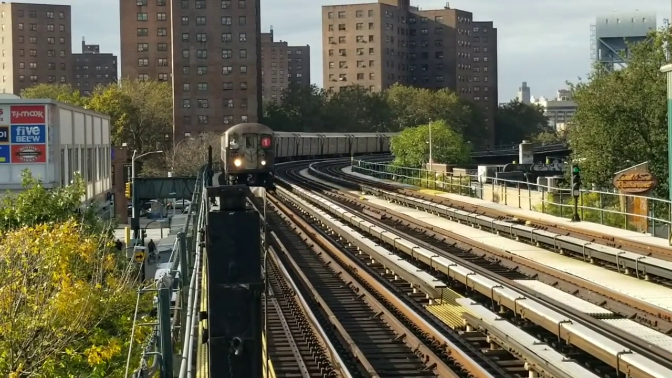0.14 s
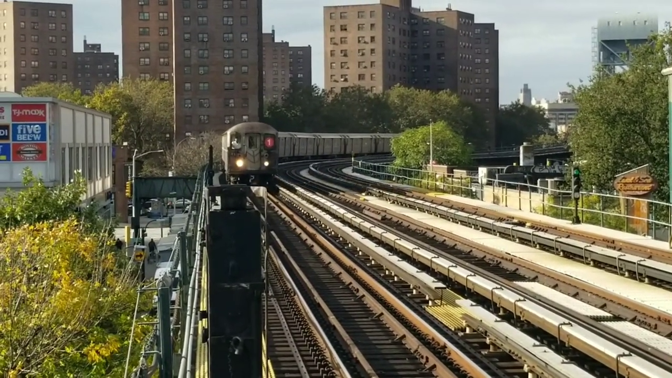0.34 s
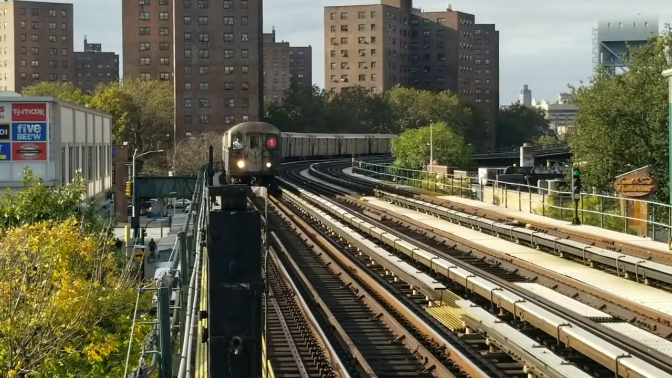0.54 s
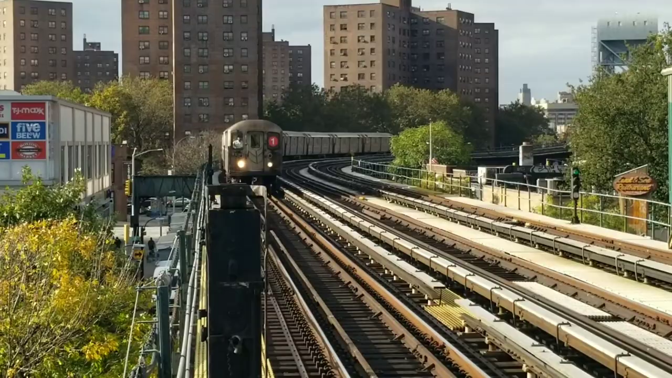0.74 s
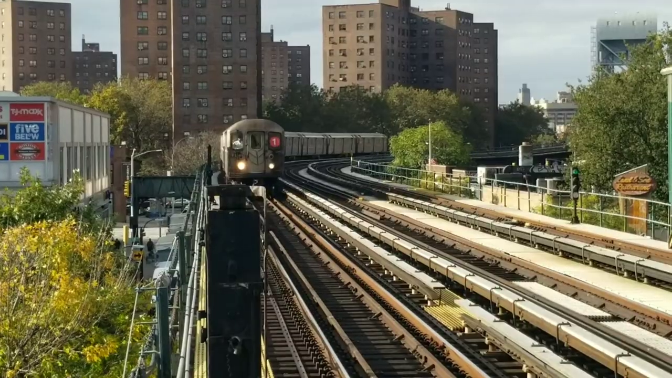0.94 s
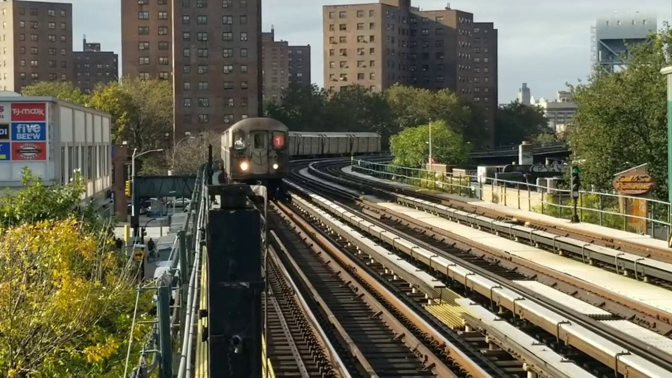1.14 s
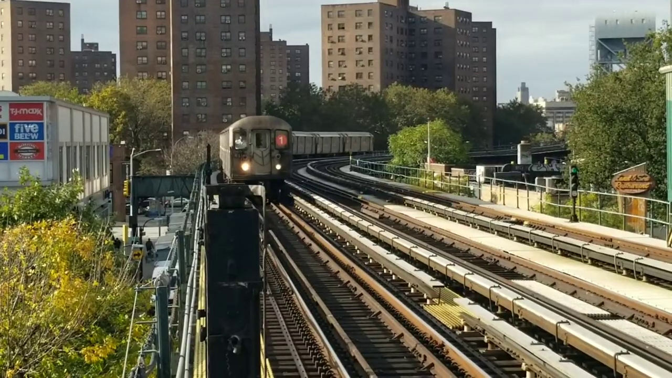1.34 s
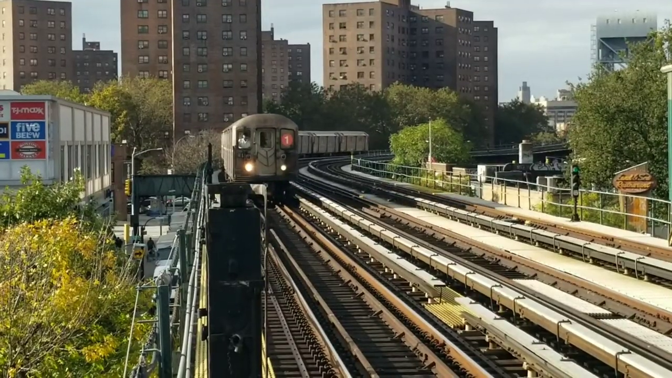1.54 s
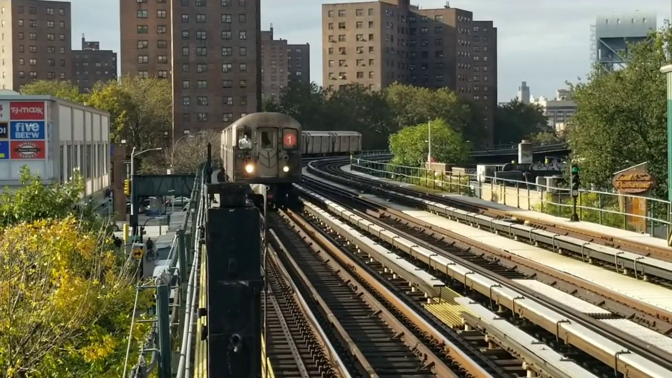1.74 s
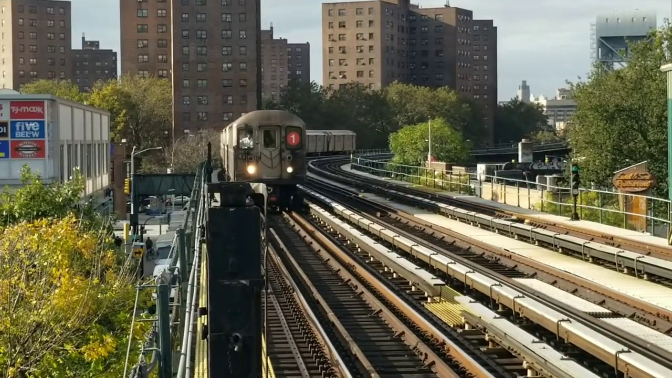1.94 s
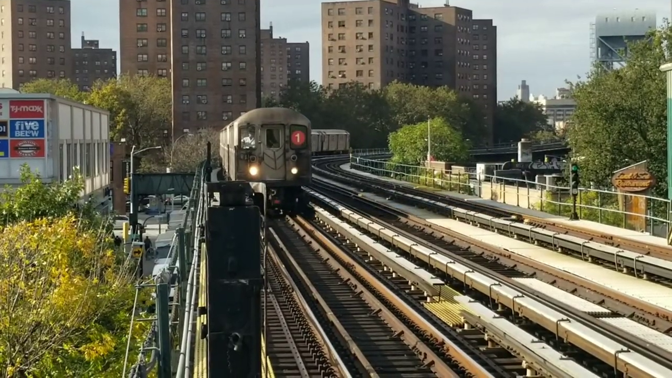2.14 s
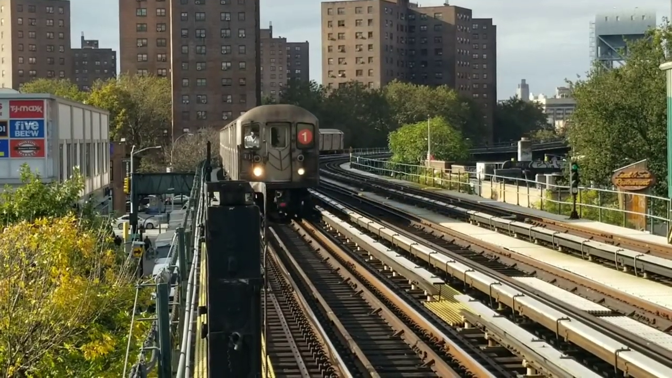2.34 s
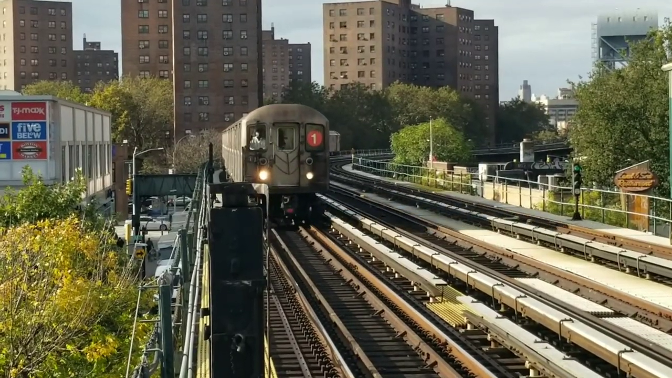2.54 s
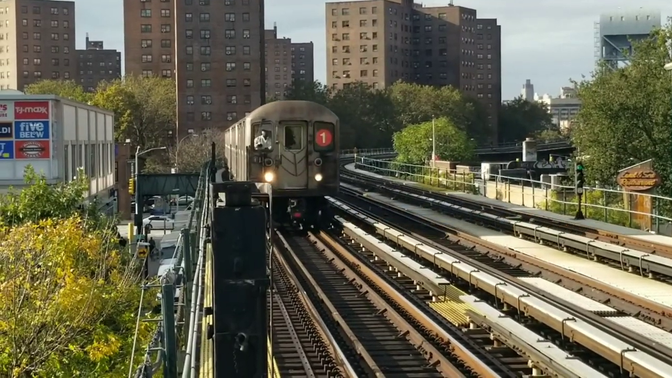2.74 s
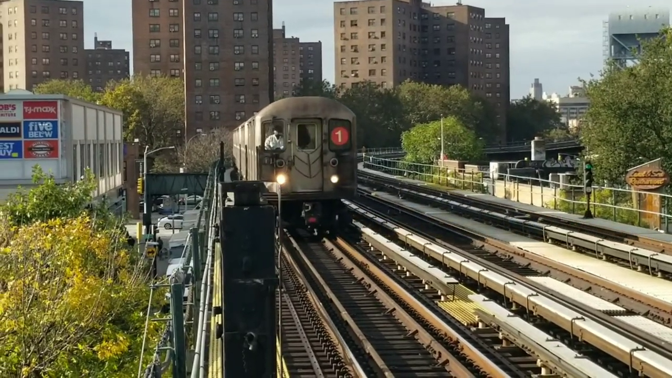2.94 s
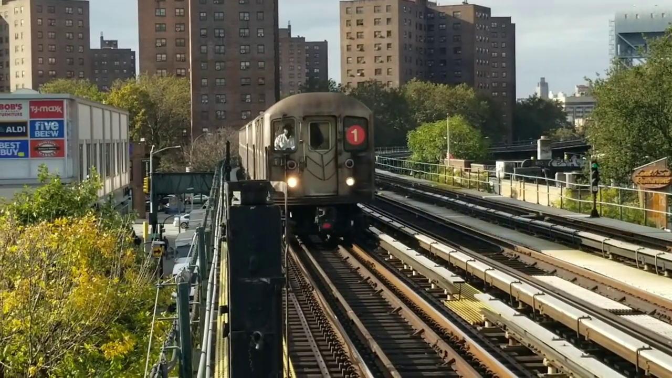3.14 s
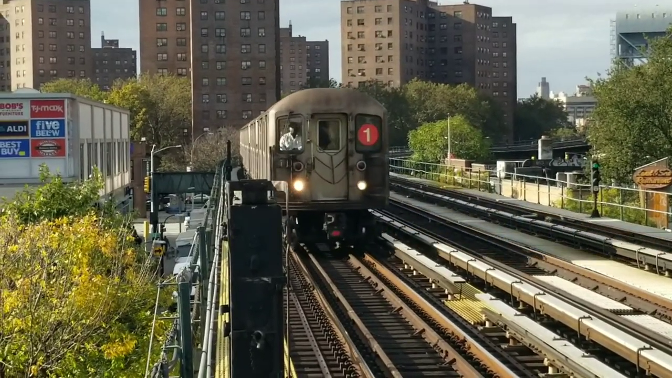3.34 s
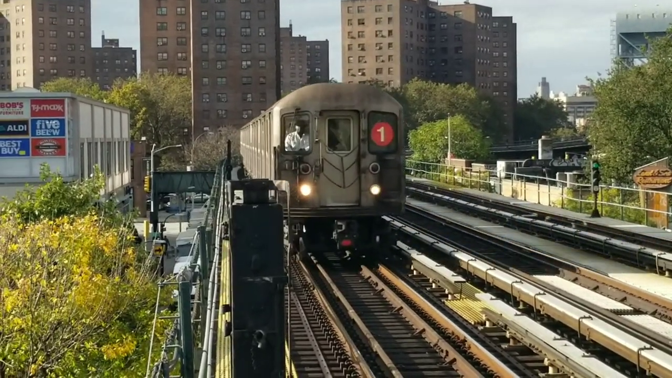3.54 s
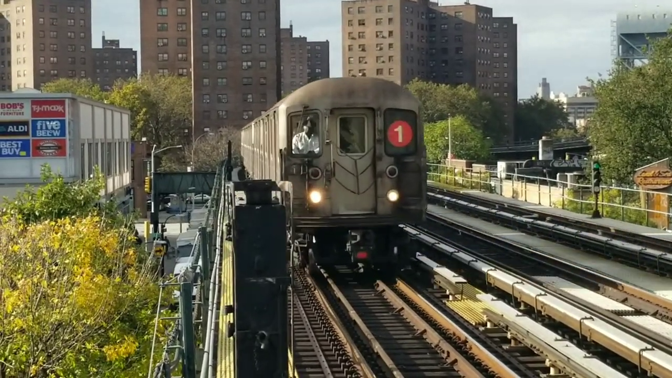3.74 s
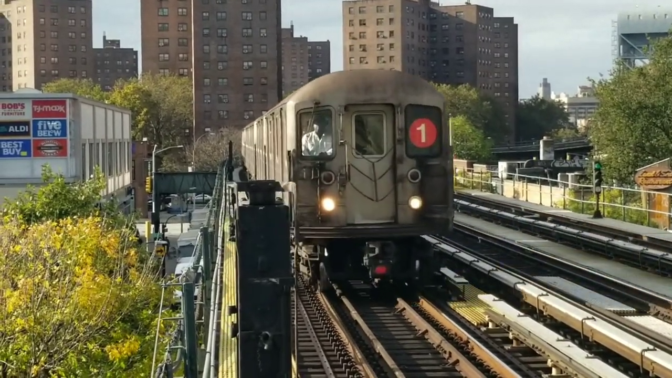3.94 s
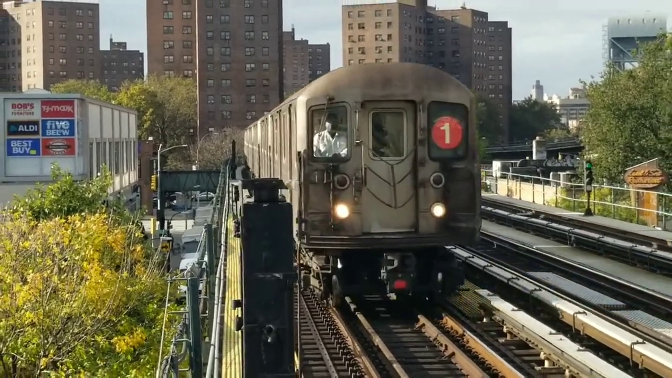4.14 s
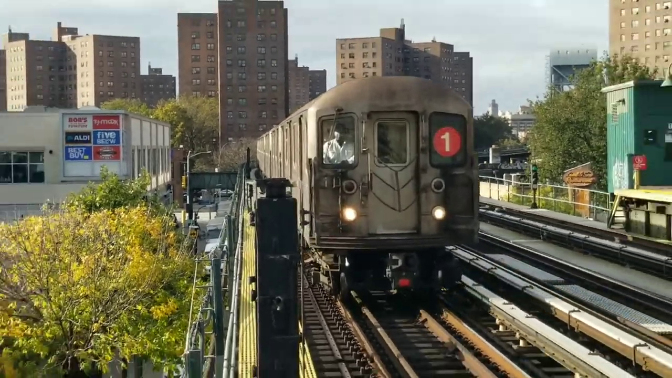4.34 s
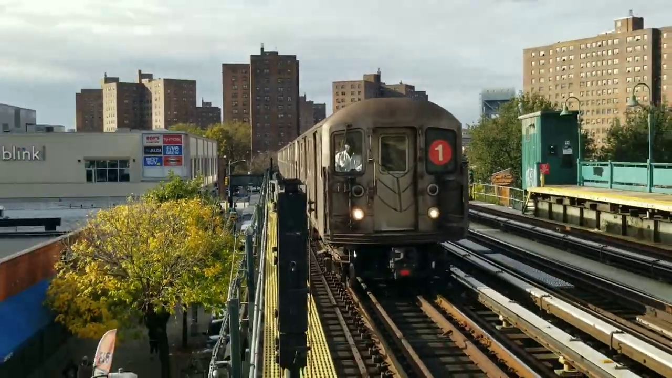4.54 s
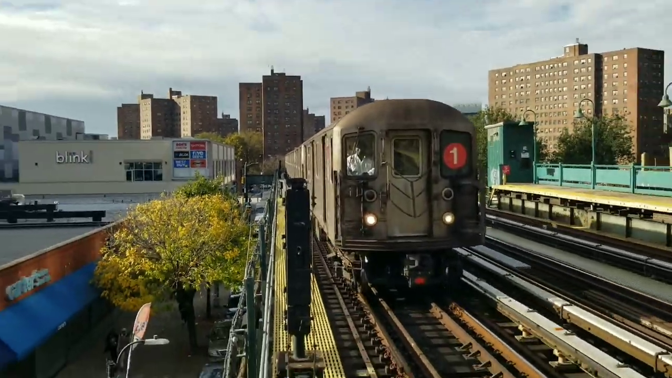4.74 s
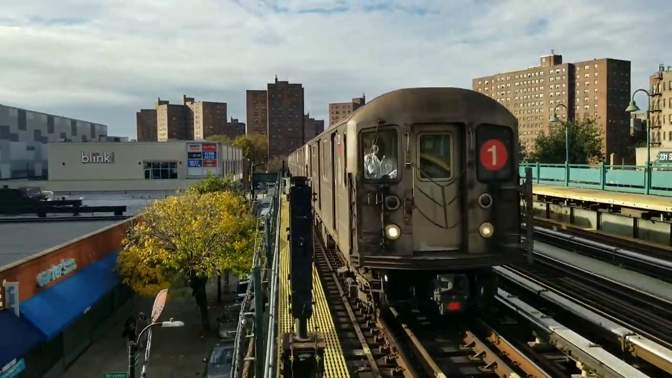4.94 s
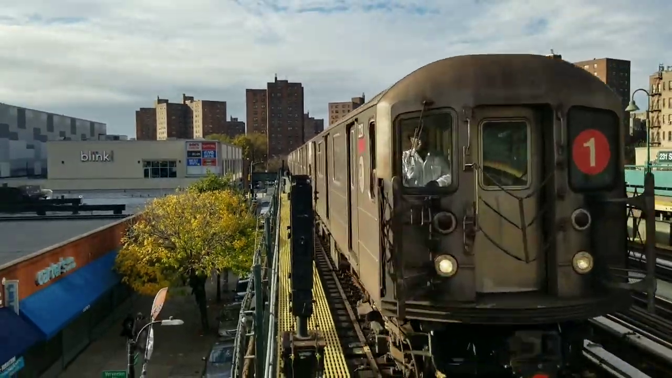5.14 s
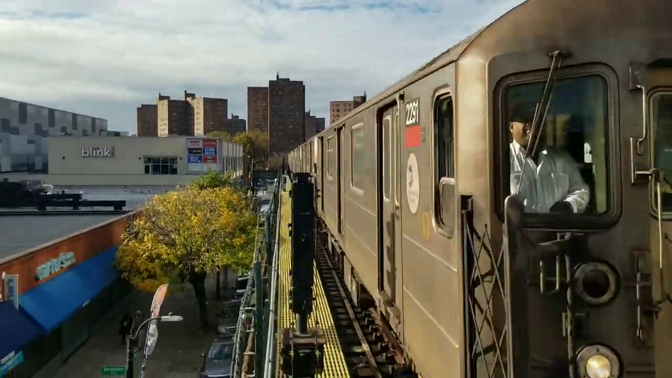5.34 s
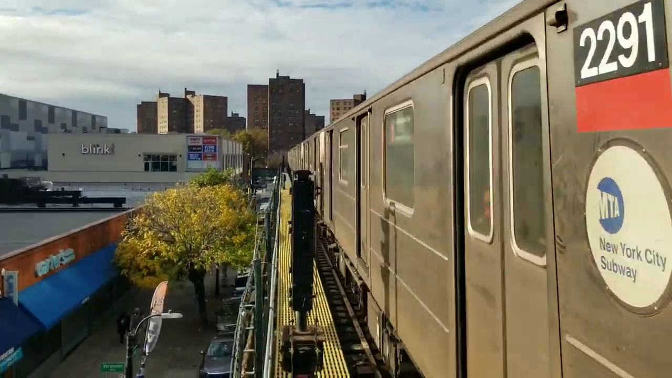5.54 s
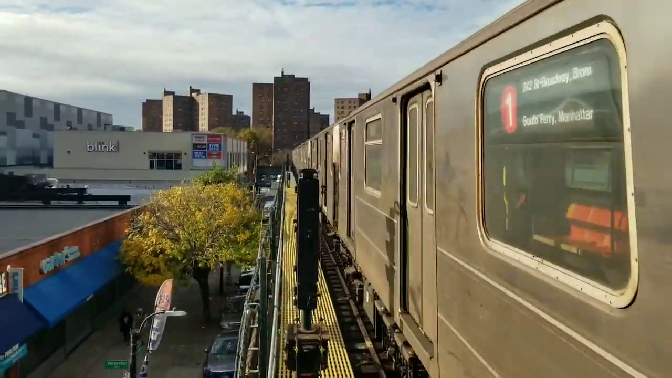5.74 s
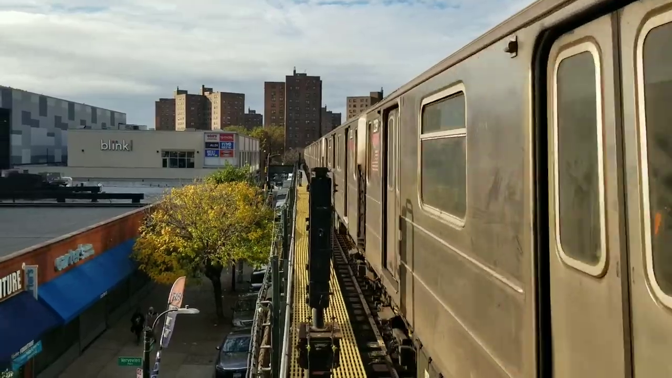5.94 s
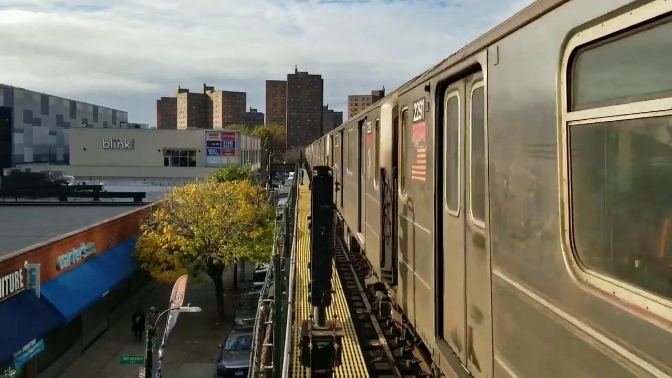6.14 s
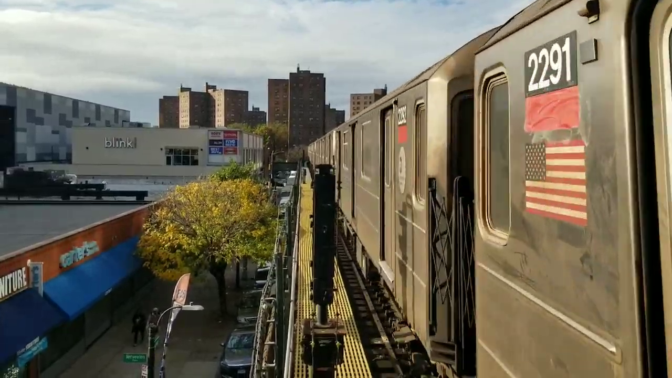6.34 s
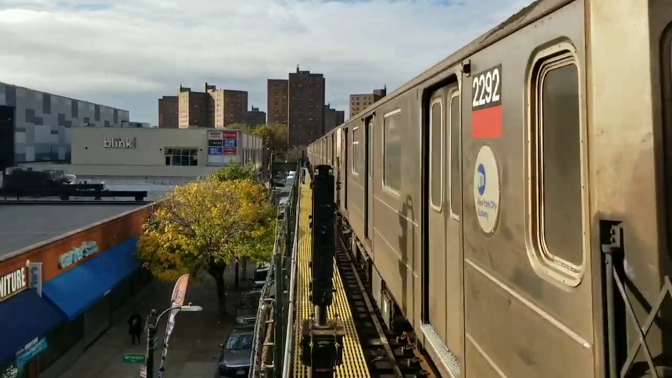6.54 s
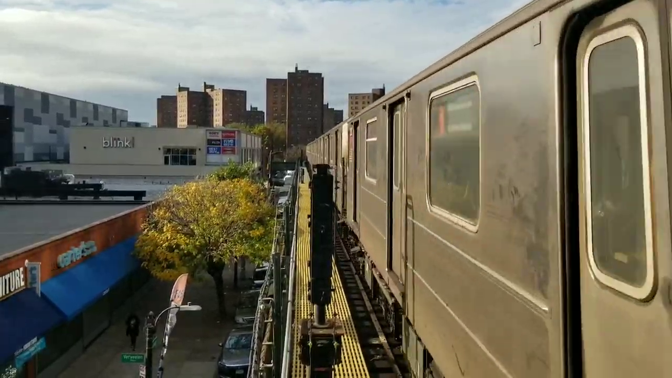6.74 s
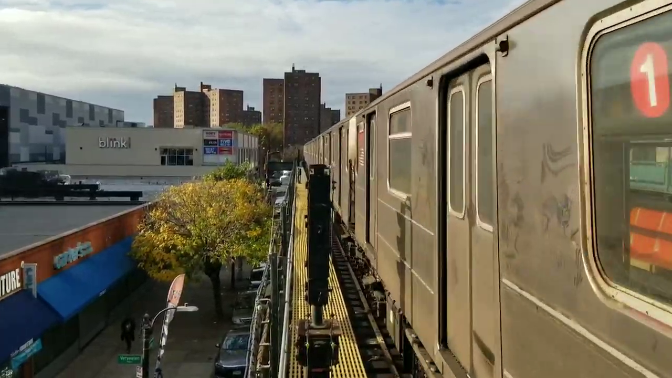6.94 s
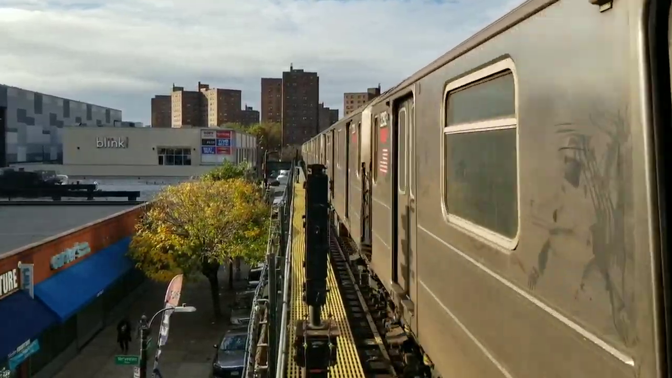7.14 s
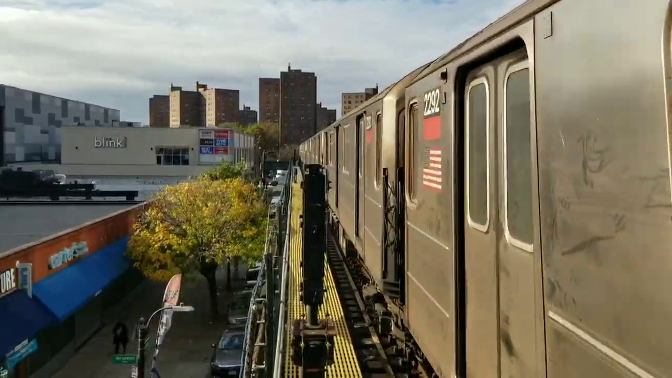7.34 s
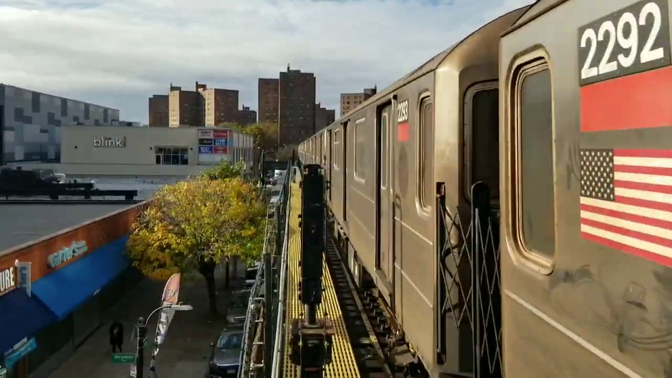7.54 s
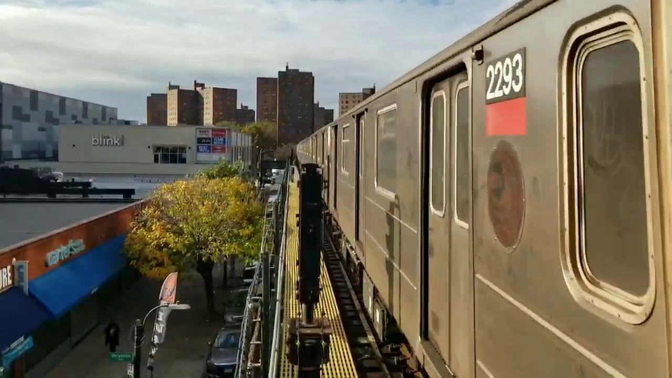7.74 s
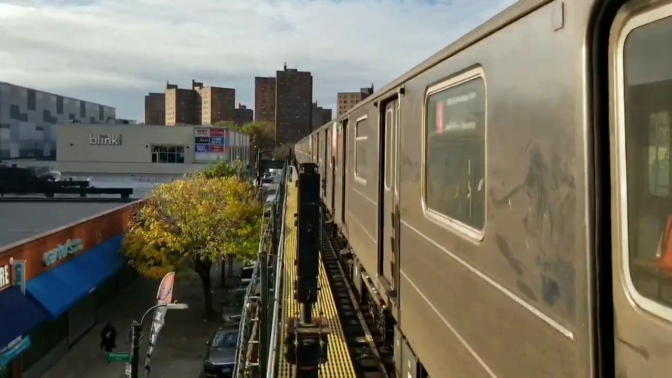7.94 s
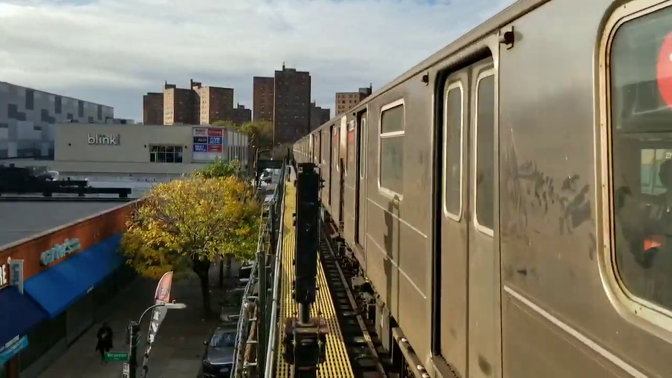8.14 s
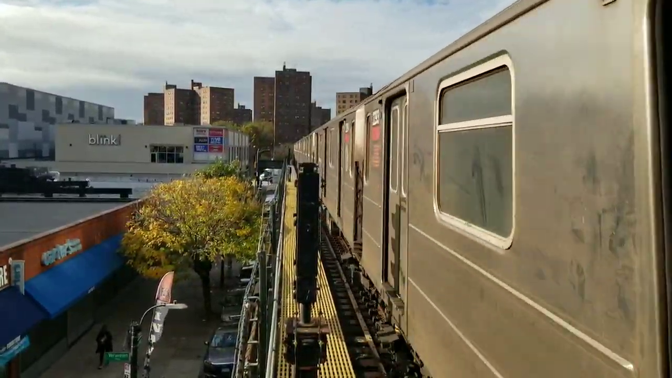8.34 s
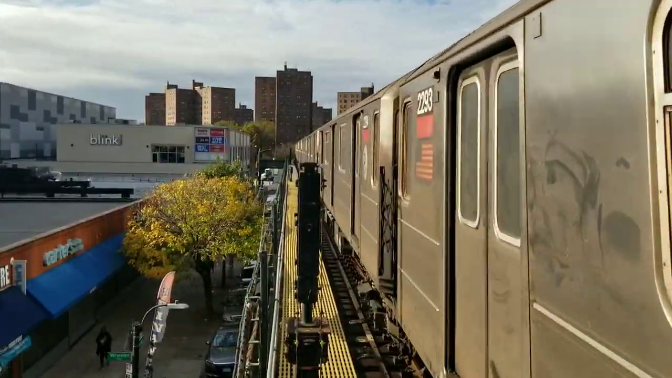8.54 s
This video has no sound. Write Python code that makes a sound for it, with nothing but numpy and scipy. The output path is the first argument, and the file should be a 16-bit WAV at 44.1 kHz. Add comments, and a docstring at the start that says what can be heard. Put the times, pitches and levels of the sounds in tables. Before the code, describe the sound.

A heavy rumble grows steadily while thin, wavering wheel tones chirp about five or six times a second. The train suddenly arrives beside a close stereo microphone on the steel viaduct, with hard joint knocks, ringing clangs, gritty crackle and scraping squeals. Pushed air thumps the microphone, then the roar drops; softer wheel knocks and rattles continue until a hum and squeals raise the end.

```python
"""On a steel viaduct by a curve: a subway train nears from 38 m and passes 1.4 m from a two-port microphone.
Level-shaped noise makes the deck rumble and wheel roar; decaying modes and noise make joints, snaps and rattles.
Wavering narrow-band tones sing in the curve and squeal alongside; low noise bursts buffet each port.
The later cars roll by more quietly, with thin brake whistles, a gear hum and one more run of squeals."""
import sys
import numpy as np
from scipy import signal
from scipy.fft import rfft, irfft, next_fast_len
from scipy.io import wavfile
from scipy.ndimage import uniform_filter1d

SR = 44100
rng = np.random.default_rng(int(sys.argv[2]) if len(sys.argv) > 2 else 0)


def persist_wave(psi):
    """Save psi, clipped to +-1, as 16-bit WAV."""
    counts = np.round(np.clip(psi, -1, 1) * 32767).astype(np.int16)
    wavfile.write(sys.argv[1], SR, np.atleast_2d(counts).T)


N = 383229
TIME = np.arange(N) / SR
FRAME, HOP = 2048, 256  # samples
EDGE_HZ = 15650  # upper band limit
TRUCK_S = 0.34  # half length of a truck's swell
GRIT_PEAK_S, GRIT_HALF_S = 5.19, 0.33
RATTLE_FROM_S = 4.93
SQUEAL_ATTACK_S, SQUEAL_RELEASE_S = 0.023, 0.031
SPAN_REACH_M = 59  # distance scale of the span resonance

# Train position: t/s, distance to nearest wheels/m, stage (0 ahead, 1 first truck, 2 alongside; clipped to 0-2)
APPROACH = [(0, 37.6, 0.11), (2.5, 28.6, 0), (3.6, 19.5, 0), (4.5, 11.8, 0.06), (4.86, 12, -0.1),
            (4.93, 4.1, 1.17), (5.75, 1.4, 0.98), (6.15, 9.9, 3)]
# Rolling-noise colour at each stage, before its bands are levelled: f/Hz, density/dB per Hz
AHEAD_COLOUR = [(25, -1), (52, 9), (130, -2), (235, -4), (345, -2), (460, -7), (600, -18.5), (1200, -27.5),
                (1600, -27.5), (1780, -30), (2050, -29.5), (2500, -27.5), (3300, -31.5), (5200, -35.5),
                (6500, -44.5), (7800, -51), (10500, -49), (15000, -64.5)]
FIRST_TRUCK_COLOUR = [(30, -3), (55, -1), (130, -1.5), (400, 1.5), (620, -8.5), (1200, -11), (1600, -12),
                      (1850, -13.5), (2500, -17.5), (3300, -29), (5200, -35), (7800, -40.5), (10500, -40),
                      (15000, -39.5)]
ALONGSIDE_COLOUR = [(28, -14), (52, 7.5), (85, 4), (150, -1), (250, -3.5), (430, -2), (620, -10.5),
                    (1050, -18.5), (1300, -19), (1770, -24), (2100, -20.5), (2500, -25), (3300, -26.5),
                    (5200, -27), (7800, -39), (10500, -32.5), (15000, -39.5)]
# What the two ports hear at each stage: f/Hz, likeness/0-1, left over right/dB, left lead/rad
PORTS_AHEAD = [(60, .98, 1.6, .16), (200, .97, 2.8, .17), (380, .93, 4, .25), (650, .57, 3, 1),
               (950, .52, 3.8, 1), (1300, .22, 3.1, 2.2), (1800, .66, 4.2, 3.3), (2400, .6, .6, 6.2),
               (3000, .55, 1.2, 7.2), (3500, .35, 1.5, 9.3), (4500, .25, 1.4, 12), (9000, .1, .8, 24)]
PORTS_FIRST_TRUCK = [(60, .6, 6.5, .1), (190, .6, 6.5, .3), (430, .82, 6.8, -.1), (700, .4, 8, -.4),
                     (1500, .25, 11, -.9), (2100, .45, 7.5, -2.4), (2650, .35, 8.5, .2),
                     (4400, .25, 3.5, 4.3), (7400, .15, 7, 8), (9500, .1, 1, 12), (15000, .1, 6, 24)]
PORTS_ALONGSIDE = [(60, .95, .9, .15), (200, .94, 2, .08), (380, .88, 4, -.05), (900, .63, 4.2, -.8),
                   (1500, .45, 3.8, -1.2), (1900, .55, 4, -2.9), (2500, .36, 1.4, -.4),
                   (3400, .42, 1.3, 2.6), (5200, .45, 1.8, 8.3), (8000, .12, .7, 12)]
# Wheel and rail resonances excited by rolling: f/Hz, width/Hz, bump/dB
RAIL_MODES = [(1400, 105, 3), (1886, 130, 2.5), (2416, 120, 3.5), (3980, 360, 3.5), (4700, 300, 3),
              (5680, 1200, 6), (9170, 850, 3)]
# Girder resonance of the nearest span, stronger as the train closes in: f/Hz, width/Hz, full bump/dB
SPAN_MODES = [(153, 79, 1.5)]
# Girder boom, deck rumble, wheel roar and rail hiss: from f/Hz, to f/Hz
BANDS = [(20, 110), (110, 550), (550, 2200), (3200, 15500)]
# A row per band: base level/dB ahead, at first truck, alongside; loss/dB per m; share of a truck's swell/1
BAND_RULES = [(-27, -26, -28, 0, 0.79), (-18.5, -18, -19.5, 0.2388, 0.14), (-28.5, -25, -29, 0.16, 0.036),
              (-39, -36.5, -41, 0.2255, 0.74)]
# Overall level offset of the rolling noise: t/s, level/dB
ROLL = [(0, -1.5), (1.7, -1.5), (2.3, -0.5), (3.2, 0), (4.2, -1), (4.55, 0.2), (5.6, -1), (5.88, -5.5),
        (6.15, -9), (6.8, -8), (7, -11.5), (8.05, -11), (8.42, -6.5), (8.69, -3.5)]
# Trucks passing the microphone: t/s, swell/dB before each band's share
TRUCKS = [(5.08, 2.5), (6.25, 2.5), (7.7, 6.5), (8.68, 3)]
# Flange rubs in the curve: peak t/s, half length/s, f/Hz, level/dB
RUBS = [(.155, 0.024, 2455, -40.5), (.255, 0.045, 2465, -41), (.4, .04, 2530, -49),
        (.53, 0.046, 2460, -46.5), (.69, 0.067, 2490, -43.5), (.83, .05, 2495, -47),
        (1.0, 0.027, 2490, -43), (1.32, 0.045, 2475, -45), (1.44, .04, 2480, -41.5),
        (1.58, 0.051, 2440, -42), (1.84, .06, 2485, -43), (2.0, 0.038, 2500, -41.5),
        (2.17, 0.088, 2480, -42.5), (2.345, .048, 2494, -36), (2.47, 0.056, 2435, -39.5),
        (2.66, 0.05, 2485, -45), (2.835, 0.045, 2504, -37), (3.035, 0.058, 2500, -38),
        (3.185, 0.075, 2466, -32), (3.365, 0.09, 2490, -35.5), (3.505, 0.058, 2488, -31.5),
        (3.695, .052, 2490, -37.5), (3.865, 0.054, 2476, -32.5), (4.03, .06, 2453, -35.5),
        (4.19, 0.05, 2490, -36.5), (4.36, .066, 2460, -35.5), (4.55, .066, 2470, -37)]
# Short narrow tones (flange squeaks, a clang near 2.1 kHz, a lingering brake tone near 5.3 kHz):
# peak t/s, half length/s, f/Hz, level/dB, width setting/Hz
SHORT_TONES = [(.19, .035, 2690, -46, 25), (1.248, .04, 2930, -46, 70), (2.117, .025, 2750, -42, 50),
               (3.335, .035, 3680, -41, 70), (4.78, .073, 4750, -44, 90), (4.95, .035, 3980, -37, 64),
               (5.33, 0.016, 2090, -27.5, 30), (5.347, .02, 2420, -35, 20), (6.265, 0.02, 5270, -46, 23),
               (6.35, .07, 5240, -52, 20), (7.68, .012, 7040, -58, 75), (8.419, .068, 1636, -43, 60),
               (8.598, .09, 2030, -45, 40)]
# Wheels striking joints: t/s, relative thud, clang and chink levels/dB, rise/s, left over right/dB,
# share of the joint modes/1
KNOCKS = [(4.887, -23, -29, -37, 0.0063, 12, .4), (4.924, -26, -16.5, -28.5, 0.0034, 13, 0.46),
          (5.064, -38, -24.5, -32, 0.0065, 15, 0.33), (5.131, -15, -18.5, -31, 0.012, 8, 0.52),
          (5.305, -12.5, -19.5, -34, 0.0067, 8, 0.52), (5.455, -10, -22, -42, 0.0024, 10, .4),
          (5.53, -39, -13.5, -27.5, .002, 10, 0.82), (5.668, -12.5, -18.5, -30.5, 0.0053, 3, 0.73),
          (5.828, -15, -27.5, -35, 0.0034, 13, .3), (6.299, -28, -34, -40.5, 0.0029, 3, 0.28),
          (6.44, -26, -35, -44, 0.0034, 2, .3), (6.629, -22, -27.5, -40, 0.005, 2.5, 0.49),
          (6.782, -26, -31, -48, 0.0048, 3, 0.44), (7.443, -40, -32.5, -45.5, 0.0025, 4, 0.48),
          (7.599, -36, -34.5, -44.5, 0.0034, 4, 0.61), (7.792, -29.5, -32.5, -45, 0.001, 3, .15),
          (7.952, -33, -31.5, -42.5, 0.0053, 3, 0.51), (8.188, -30, -39, -53, .001, 2, .3),
          (8.556, -21, -34, -42, 0.012, 2, .3), (8.646, -23, -23, -33.5, 0.0014, 4, 0.94)]
# Resonances of a struck joint at full share: f/Hz, width/Hz, bump/dB
JOINT_MODES = [(695, 120, 8.7), (940, 120, 3.9), (1440, 130, 5.2), (1610, 150, 13.5), (2080, 170, 11),
               (3720, 300, 1.4), (5000, 600, 13.5), (7340, 500, 2.2)]
# Smooth colour of a struck joint: f/Hz, density/dB per Hz, relative t60 (scaled where used)/s
JOINT_COLOUR = [(30, -21, 0.12), (111, -3, 0.14), (382, -1, 0.09), (696, -5.5, 0.59), (1050, -4.5, 0.21),
                (1500, -5.5, 0.14), (1800, -11, 0.3), (2370, -12.5, 0.32), (3400, -12, 0.26),
                (5400, -11, 0.25), (8400, -23.5, 0.31), (11000, -16, 0.29), (15000, -27, .14)]
# Steel snaps from the running gear: t/s, relative snap level/dB, relative clack level/dB, left over right/dB
SNAPS = [(4.894, -29, -34, 4.5), (4.9287, -17, -25, -5), (5.0685, -26, -32, 5), (5.141, -34, -26, 5),
         (5.53, -28, -15, 10), (5.674, -36, -17, 6), (5.829, -27, -34, 7.5), (5.913, -39, -15, -11),
         (6.634, -43, -21, 0), (7.793, -48, -32, -1), (8.647, -34, -23, -1)]
# Colour of the bright snaps: f/Hz, density/dB per Hz
SNAP_COLOUR = [(200, -20), (1000, 14), (3000, -13), (6500, 1), (9000, -2), (15000, -7)]
# Colour of the dull clacks behind the snaps: f/Hz, density/dB per Hz
CLACK_COLOUR = [(150, -15), (650, 2.5), (1000, -1), (1600, -3), (2000, -22), (3000, -11.5), (6000, -34),
                (15000, -50)]
# Colour of crackle under the first truck: f/Hz, density/dB per Hz
GRIT_COLOUR = [(200, -17), (900, 0), (2200, -2), (3300, -12), (5500, -8), (8000, -14), (15000, -20)]
# Individually placed link clacks: t/s, f/Hz, level/dB
CLACKS = [(5.041, 950, -17), (5.128, 880, -12), (5.278, 1480, -13), (5.307, 715, -12), (5.457, 400, -17),
          (5.606, 715, -16), (5.876, 1040, -19), (5.946, 950, -16), (6.01, 1350, -19.5), (6.199, 1210, -29),
          (6.3, 714, -31), (6.414, 635, -29), (6.59, 640, -20), (6.825, 690, -24), (6.887, 342, -20),
          (7.185, 1050, -33), (7.303, 640, -25), (7.424, 645, -29), (7.443, 875, -27), (7.518, 1500, -31),
          (7.883, 625, -38), (7.954, 625, -20), (8.187, 660, -26), (8.397, 613, -23), (8.558, 710, -19.5)]
# Modes of a loose link: frequency ratio/1, relative level/dB, decay time constant/s
LINK_MODES = [(1, -2, 0.0074), (1.47, -9, 0.0054), (2.35, -14, .004), (3.9, -18, .003)]
# Squeals alongside: start t/s, length/s, f/Hz, glide/Hz per s, level/dB, left over right/dB, roughness/0-1
SQUEALS = [(5.06, 0.12, 2645, -40, -51, 14, .5), (5.165, 0.24, 2370, 25, -36.5, 10, 0.4),
           (5.19, 0.26, 2634, -200, -37.5, 14, .25), (5.395, 0.19, 2595, -280, -33, 14, 0.1),
           (5.407, 0.16, 2380, -58, -37, 10, 0.9), (5.531, 0.14, 2310, 80, -35, 10, 0.8),
           (5.57, 0.13, 2535, -48, -36, 16, 0.4), (5.699, 0.157, 2384, 150, -38.5, 10, .8),
           (8.201, 0.094, 1535, 40, -42, 5, .15), (8.276, 0.125, 1540, -110, -39.5, 5, 0.14),
           (8.39, 0.17, 1517, -110, -39.5, 7, 0.05), (8.592, 0.11, 1517, -350, -35, 5, 0.5)]
# Bow-wave eddies: peak t/s, half length/s, level/dB, corner f/Hz, port (0 left, 1 right)
GUSTS = [(5.694, 0.06, -13.5, 168, 0), (5.905, 0.046, -7.5, 84.6, 0), (5.962, 0.03, -21.5, 220, 0),
         (6.012, 0.033, -20, 130, 0), (5.679, 0.04, -15.5, 600, 1), (5.745, 0.014, -10.5, 150, 1),
         (5.878, 0.0061, -17, 900, 1), (5.93, 0.045, -12.5, 427, 1), (6.009, 0.058, -19.5, 260, 1)]
# Partials of the brake whistle: f/Hz, relative level/dB
BRAKE_MODES = [(5290, -2), (6449, -10), (9570, -8), (10621, -3), (11550, 0), (13544, -13), (14438, -14)]
# Brake-shoe grabs: peak t/s, half length/s, relative level/dB
BRAKE_GRABS = [(6.077, .02, -51), (6.17, 0.035, -51), (6.259, 0.032, -43), (6.343, .03, -51),
               (6.825, .02, -54)]


def gain_of(db):
    """Decibels to amplitude."""
    return 10 ** (np.asarray(db) / 20)


def evened(x):
    """Scales to rms 1."""
    return x / np.sqrt(np.mean(x ** 2) + 1e-20)


def across(table, hz):
    """The columns of a table, read on a log-frequency axis."""
    f, *columns = np.transpose(table)
    return [np.interp(np.log(hz + 1), np.log(f + 1), c) for c in columns]


def along(table, t):
    """The columns of a table, read in time."""
    s, *columns = np.transpose(table)
    return [np.interp(t, s, c) for c in columns]


def add(mix, s, sound):
    """Adds a stereo sound to the mix at time s."""
    part = mix[:, round(s * SR):][:, :sound.shape[1]]
    part += sound[:, :part.shape[1]]


def swell(s, half):
    """A smooth rise and fall around time s."""
    return np.exp(-((TIME - s) / half) ** 2)


def panned(balance_db):
    """Left and right gains for a level difference."""
    return gain_of(np.array([[.5], [-.5]]) * balance_db)


def drift(rate_hz, count=N):
    """Slow chance of rms 1 with changes up to about this rate."""
    length = next_fast_len(count, real=True)
    hz = np.fft.rfftfreq(length, 1 / SR)
    spectrum = rfft(rng.standard_normal(length)) / (1 + (hz / rate_hz) ** 4)
    return evened(irfft(spectrum, length)[:count])


def fuzz(rate_hz, count=N):
    """Two unrelated complex flutters of rms 1, low-passed at the rate."""
    white = rng.standard_normal((2, count)) + 1j * rng.standard_normal((2, count))
    slow = signal.sosfilt(signal.butter(2, rate_hz, fs=SR, output="sos"), white)
    return slow / np.std(slow)


def fuzzy_tone(hz, width_hz, t):
    """A carrier smeared by a different flutter at each port."""
    return (fuzz(width_hz, len(t)) * np.exp(2j * np.pi * hz * t)).real


def coloured(x, table):
    """Gives a stereo sound the colour of a table."""
    count = x.shape[1]
    length = next_fast_len(count, real=True)
    colour_db = across(table, np.fft.rfftfreq(length, 1 / SR))[0]
    return irfft(rfft(x, length) * evened(gain_of(colour_db)), length)[:, :count]


def resonances(modes, hz):
    """The dB bumps of a set of broad modes."""
    return sum(db / (1 + (2 * (hz - f) / width) ** 2) for f, width, db in modes)


def port_pair(ports, hz, noise):
    """Mixes two unrelated noises into what the ports hear: likeness, balance and left lead."""
    same, balance_db, lead = ports
    same = np.clip(same, 0, 1)
    right = (same * noise[0] + np.sqrt(1 - same ** 2) * noise[1]) * np.exp(-1j * lead)
    ratio = gain_of(balance_db)
    return np.array([ratio * noise[0], right]) * np.sqrt(2 / (1 + ratio ** 2))


def voiced(colour_db, hz, bands, levels_db):
    """Bends a colour smoothly towards the given level in each band."""
    power = gain_of(colour_db) ** 2 / len(hz)
    bend_db = 0
    inner_hz = np.ravel(np.array(bands) * [1.3, 1 / 1.3])  # full correction here, sloping between bands
    for (lo, hi), level_db, own in zip(bands, levels_db, np.eye(len(bands))):
        now_db = 10 * np.log10(power[..., (hz >= lo) & (hz < hi)].sum(-1))
        weight = np.interp(hz, inner_hz, np.repeat(own, 2))
        bend_db = bend_db + np.multiply.outer(level_db - now_db, weight)
    return gain_of(colour_db + bend_db)


def band_levels(t, metres, shares):
    """Each band has its level at each stage, fades with distance, and swells as a truck goes by."""
    rules = np.array(BAND_RULES)
    truck_db = sum(db * np.exp(-((t - s) / TRUCK_S) ** 2) for s, db in TRUCKS)
    level_db = rules[:, :3] @ shares.T - np.outer(rules[:, 3], metres)
    return level_db + np.outer(rules[:, 4], truck_db) + along(ROLL, t)[0]


def fine_ripple(hz, depth_db):
    """A random fine unevenness of the noise colour over frequency, growing towards the treble."""
    ripple = evened(uniform_filter1d(rng.standard_normal(len(hz)), size=4))
    return depth_db * ripple * hz ** 2 / (hz ** 2 + 8000 ** 2)


def rolling(air_db_per_m=0.66, patchy_db=1.17, chatter_db=1.0):
    """Rough wheels on rough rail shake the deck; the air dulls the sound while the train is far."""
    white = rng.standard_normal((2, N))
    hz, t, noise = signal.stft(white, SR, nperseg=FRAME, noverlap=FRAME - HOP)
    noise = noise.transpose(0, 2, 1)
    metres, stage = along(APPROACH, t)
    # crossfade between neighbouring stages
    shares = np.maximum(1 - abs(np.clip(stage, 0, 2)[:, None] - np.arange(3)), 0)
    colours = [across(c, hz)[0] for c in (AHEAD_COLOUR, FIRST_TRUCK_COLOUR, ALONGSIDE_COLOUR)]
    colour_db = shares @ np.array(colours) + resonances(RAIL_MODES, hz)
    colour_db += np.outer(np.exp(-(metres / SPAN_REACH_M) ** 2), resonances(SPAN_MODES, hz))
    # air tilt relative to 30 m; its slope is given at 8 kHz
    colour_db -= air_db_per_m * np.outer(shares[:, 0] * (metres - 30), hz / 8000)
    colour_db -= 10 * np.log10(1 + (40 / (hz + 1)) ** 10)  # girders radiate little below their lowest modes
    patches = uniform_filter1d(rng.standard_normal(colour_db.shape), size=12, axis=0)
    patches = evened(uniform_filter1d(patches, size=16, axis=1))

    ports = np.array([across(p, hz) for p in (PORTS_AHEAD, PORTS_FIRST_TRUCK, PORTS_ALONGSIDE)])
    lead = np.angle(shares @ np.exp(1j * ports[:, 2]))
    heard = shares @ ports[:, 0], shares @ ports[:, 1], lead
    colour_db = colour_db + fine_ripple(hz, depth_db=2.0)
    colour = voiced(colour_db, hz, BANDS, band_levels(t, metres, shares))
    z = port_pair(heard, hz, noise) * colour * gain_of(patchy_db * patches)
    sound = signal.istft(z.transpose(0, 2, 1), SR, nperseg=FRAME, noverlap=FRAME - HOP)[1][:, :N]
    # the microphone loses the deepest bass
    sound = signal.sosfilt(signal.butter(N=4, Wn=33, btype="high", fs=SR, output="sos"), sound)
    # the contact patch chatters, so everything above the rumble flutters together
    rumble = signal.sosfiltfilt(signal.butter(2, 600, fs=SR, output="sos"), sound)
    return rumble + (sound - rumble) * gain_of(chatter_db * drift(42))


def squeal(hz, waver_hz, halo, halo_hz, skirt_db, balance_db, lead):
    """Stick-slip holds one wheel mode singing; other wheels and echoes smear a halo and wide skirt round it."""
    count = len(hz)
    turn = np.exp(2j * np.pi * np.cumsum(hz + waver_hz * drift(43.0, count)) / SR)
    halo = np.clip(halo, 0, 1)
    smear = np.sqrt(halo) * fuzz(halo_hz, count) + gain_of(skirt_db) * fuzz(106, count)
    line = np.sqrt(1 - halo) * np.array([[1], [0]])
    voice = port_pair((.85, balance_db, lead), hz, smear + line)
    return np.sqrt(2) * (voice * turn).real


def curve_song(far_halo=0.61, near_halo=0.08, clear_m=20,
               echo_db=-11, echo_drop_hz=55, echo_smear_hz=70, echo_delay_s=0.022, echo_spread=1.5):
    """A flange rubs the curved rail about once a wheel turn; blurred echoes follow, a little lower in pitch."""
    out, t = np.zeros((2, N)), np.arange(SR // 2) / SR - 1 / 8
    for s, half, hz, db in RUBS:
        # farther songs are more smeared
        halo = np.interp(along(APPROACH, s)[0], [clear_m, APPROACH[0][1]], [near_halo, far_halo])
        tone = squeal(np.full(len(t), hz), waver_hz=9, halo=halo, halo_hz=30,
                      skirt_db=-18.0, balance_db=-0.5, lead=.1)
        echo = np.sqrt(2) * fuzzy_tone(hz - echo_drop_hz, echo_smear_hz, t)
        echo *= gain_of(echo_db) * np.exp(-((t - echo_delay_s) / (echo_spread * half)) ** 2)
        add(out, s + t[0], gain_of(db) * (tone * np.exp(-abs(t / half) ** 3) + echo))
    return out


def far_whine(count=64, until_s=4.6, lowest_hz=2150, highest_hz=2850,
              base_db=-50, half_s=0.046, spread_db=3.5, smear_hz=25):
    """Wheels further back in the curve whine briefly, each at its own pitch."""
    out, t = np.zeros((2, N)), np.arange(SR // 4) / SR - 1 / 8
    for k, (when, pitch, size) in enumerate(rng.random((count, 3))):
        hz = lowest_hz + pitch * (highest_hz - lowest_hz)
        level_db = base_db + spread_db * (2 * size + 0.5)
        tone = fuzzy_tone(hz, smear_hz, t) * np.exp(-(t / half_s) ** 2)
        add(out, (k + when) / count * until_s, tone * gain_of(level_db))
    return out


def short_tones():
    """Short narrow tones: flange squeaks, a clang near 2.1 kHz, a lingering brake tone near 5.3 kHz."""
    out, t = np.zeros((2, N)), np.arange(SR // 2) / SR - 1 / 4
    for s, half, hz, db, width_hz in SHORT_TONES:
        tone = np.sqrt(2) * fuzzy_tone(hz, width_hz, t)
        add(out, s + t[0], gain_of(db) * np.exp(-(t / half) ** 2) * tone)
    return out


def knocks(contact_s=0.0052, crack=0.27, crack_s=0.0031, tail_db=-20, tail_t60=0.54):
    """A wheel drops into a joint: a crack and a brief crunch, then rail and girders ring out."""
    out, count = np.zeros((2, N)), 16384
    clock = np.arange(count) / SR
    for s, thud_db, clang_db, chink_db, rise, balance_db, ringing in KNOCKS:
        hz = np.fft.rfftfreq(count, 1 / SR)
        same, _, lead = across(PORTS_ALONGSIDE, hz)
        colour_db = across(JOINT_COLOUR, hz)[0] + ringing * resonances(JOINT_MODES, hz)
        colour = voiced(colour_db, hz, BANDS[1:], (thud_db, clang_db, chink_db))
        noise = rfft(rng.standard_normal((2, count)))
        ring = irfft(port_pair((same, balance_db, lead), hz, noise) * colour)
        # each frequency fades at its own rate, above a weaker common tail
        hz, t, z = signal.stft(ring, SR, nperseg=256)
        age = np.maximum(t - rise - contact_s, 0)
        t60 = 0.62 * across(JOINT_COLOUR, hz)[1]
        fade = np.hypot(gain_of(-60 * age / t60[:, None]), gain_of(tail_db - 60 * age / tail_t60))
        ring = signal.istft(z * fade, SR)[1][:, :count]
        attack = np.minimum(clock / rise, 1) * (1 + crack * np.exp(-clock / crack_s))
        add(out, s, ring * attack)
    return out


def snaps(decay_s=0.0017, ring_db=-17, ring_s=0.012, clack_s=0.004):
    """Steel meets steel: a bright snap with a short ring, and the duller clack of the heavy part behind it."""
    bright, dull, t = np.zeros((2, N)), np.zeros((2, N)), np.arange(SR // 16) / SR
    for s, db, clack_db, balance_db in SNAPS:
        pan = panned(balance_db)
        envelope = np.exp(-t / decay_s) + gain_of(ring_db) * np.exp(-t / ring_s)
        add(bright, s, gain_of(db) * pan * envelope * rng.standard_normal((2, len(t))))
        # one noise shared by the ports plus one of each port's own
        both_ports = evened(rng.standard_normal(len(t)) + rng.standard_normal((2, len(t))))
        add(dull, s, gain_of(clack_db) * pan * np.exp(-t / clack_s) * both_ports)
    return coloured(bright, SNAP_COLOUR) + coloured(dull, CLACK_COLOUR)


def grit(level_db=-37, per_s=260, size_spread_db=4, decay_s=0.0011, balance_db=7):
    """Grit and rail pits crackle under the first truck: random ticks gate decaying noise."""
    sizes_db = size_spread_db * np.minimum(rng.exponential(1, N), 3)
    ticks = (rng.random(N) < per_s / SR) * gain_of(sizes_db)
    envelope = signal.lfilter([1], [1, -np.exp(-1 / (decay_s * SR))], ticks + 1e-9)
    crackle = evened(coloured(envelope * rng.standard_normal((2, N)), GRIT_COLOUR))
    return gain_of(level_db) * panned(balance_db) * crackle * swell(GRIT_PEAK_S, GRIT_HALF_S)


def clack(hz, balance_db=5.0, unlike=0.87, rise_s=0.0027, bounce_db=-7, bounce_s=.011):
    """One steel link strikes its stop, rings in a few short modes, and bounces once."""
    t = np.arange(SR // 16) / SR
    count = len(LINK_MODES)
    phases = rng.uniform(0, 2 * np.pi, (count, 1, 1)) + unlike * rng.standard_normal((count, 2, 1))
    ring = 0
    for (ratio, db, decay), phase in zip(LINK_MODES, phases):
        ring = ring + gain_of(db) * np.exp(-t / decay) * np.sin(2 * np.pi * hz * ratio * t + phase)
    out = panned(balance_db) * ring * (1 - np.exp(-t / rise_s))
    # the bounce comes at 0.5 to 2 times bounce_s
    add(out, bounce_s * rng.uniform(.5, 2), gain_of(bounce_db) * out)
    return out


def rattle(count=130, base_db=-22.0, spread_db=5, lowest_hz=550, highest_hz=2300,
           alongside_db=-8, crowding=1.5):
    """Loose links and rigging clack as cars go by: random clacks, densest at first, and separately timed ones."""
    out = np.zeros((2, N))
    for k, (when, pitch, size) in enumerate(rng.random((count, 3))):
        s = RATTLE_FROM_S + ((k + when) / count) ** crowding * (N / SR - RATTLE_FROM_S)
        hz = lowest_hz * (highest_hz / lowest_hz) ** pitch
        alongside = np.clip(along(APPROACH, s)[1] - 1, 0, 1)
        db = base_db + along(ROLL, s)[0] + spread_db * size ** 2
        db += alongside * alongside_db * (.5 + pitch)  # higher clacks drop more
        add(out, s, gain_of(db) * clack(hz))
    for s, hz, db in CLACKS:
        add(out, s, gain_of(db) * clack(hz))
    return out


def passing_squeals():
    """Each squeal catches, holds while its pitch glides, and lets go."""
    out, t = np.zeros((2, N)), np.arange(SR // 4) / SR
    for s, length, hz, glide, db, balance_db, rough in SQUEALS:
        envelope = np.clip(np.minimum(t / SQUEAL_ATTACK_S, (length - t) / SQUEAL_RELEASE_S), 0, 1)
        tone = squeal(hz + glide * t, waver_hz=8.3, halo=rough, halo_hz=45,
                      skirt_db=-17 + 12 * rough, balance_db=balance_db, lead=-0.33)
        add(out, s, tone * envelope * gain_of(db))
    return out


def bow_wave(slope=2.83, lowest_hz=32):
    """Eddies of pushed air hit each port on its own: bursts of low noise, each with its own upper corner."""
    out, count = np.zeros((2, N)), 16384
    hz, t = np.fft.rfftfreq(count, 1 / SR), (np.arange(count) - count / 2) / SR
    for s, half, db, corner_hz, port in GUSTS:
        colour = hz ** 2 / (hz ** 2 + lowest_hz ** 2)
        colour = colour / np.sqrt(1 + (hz / corner_hz) ** slope) / (1 + (hz / 2600) ** 4)
        envelope = 1 / np.cosh(1.28 * t / half)
        eddy = irfft(rfft(rng.standard_normal(count)) * colour) * envelope
        # keep the envelope's energy, so longer gusts carry more
        eddy = gain_of(db) * evened(eddy) * np.sqrt(np.mean(envelope ** 2))
        add(out, s + t[0], np.outer(np.arange(2) == port, eddy))
    return out


def brakes(smear_hz=42, hiss_db=-2):
    """A brake shoe hisses and whistles in several high, fuzzy partials each time it grabs."""
    whistle = sum(gain_of(db) * fuzzy_tone(hz, smear_hz, TIME) for hz, db in BRAKE_MODES)
    highpass = signal.butter(2, 4500, "high", fs=SR, output="sos")
    hiss = signal.sosfilt(highpass, rng.standard_normal((2, N)))
    grabs = sum(gain_of(db) * swell(s, half) for s, half, db in BRAKE_GRABS)
    return (evened(whistle) + gain_of(hiss_db) * evened(hiss)) * grabs


def gear_hum(hz=455, peak_s=8.62, half_s=0.13, level_db=-31):
    """The drive gears hum, a wavering smeared tone, as the last truck draws level."""
    tone = squeal(np.full(N, hz), waver_hz=4.7, halo=0.32, halo_hz=14, skirt_db=-22, balance_db=2, lead=0)
    return gain_of(level_db) * swell(peak_s, half_s) * tone


def scene():
    """Rolling, curve song, short tones, joints, rattles, squeals, brakes, gears and the push of air."""
    singing = curve_song() + far_whine() + short_tones() + passing_squeals()
    impacts = gain_of(-1.0) * knocks() + snaps() + grit() + rattle()
    return rolling() + singing + impacts + bow_wave() + brakes() + gear_hum()


def record(dry):
    """The microphone channel rounds off the loudest peaks, then limits the band."""
    knee = .7  # of full scale
    over = np.maximum(abs(dry) - knee, 0)
    rounded = np.sign(dry) * (abs(dry) - over + (1 - knee) * np.tanh(over / (1 - knee)))
    lowpass = signal.firwin(511, EDGE_HZ, window=("kaiser", 9), fs=SR)
    return signal.oaconvolve(rounded, lowpass[None], "same")


dry = scene()
out = record(dry)
persist_wave(out)
```